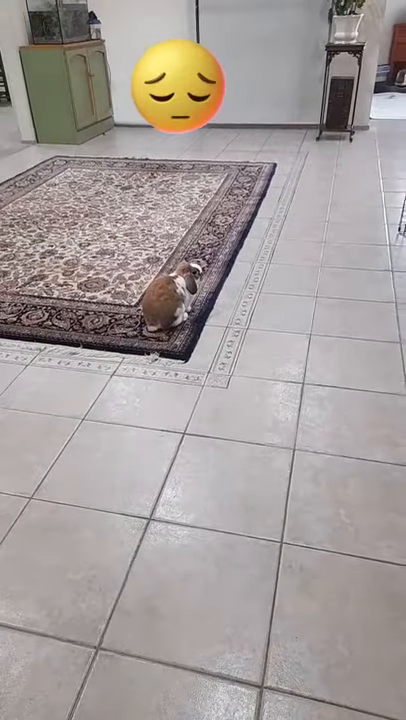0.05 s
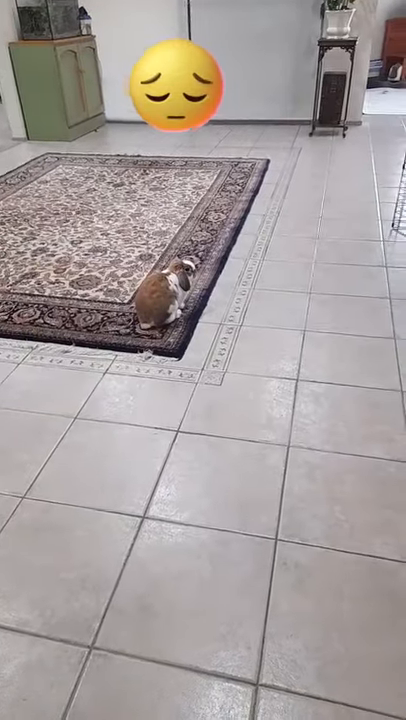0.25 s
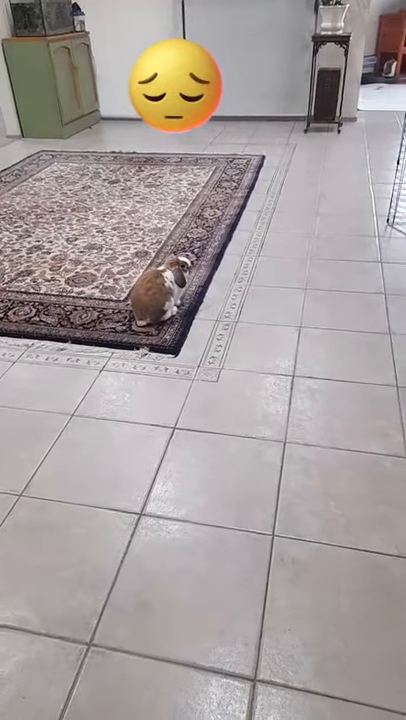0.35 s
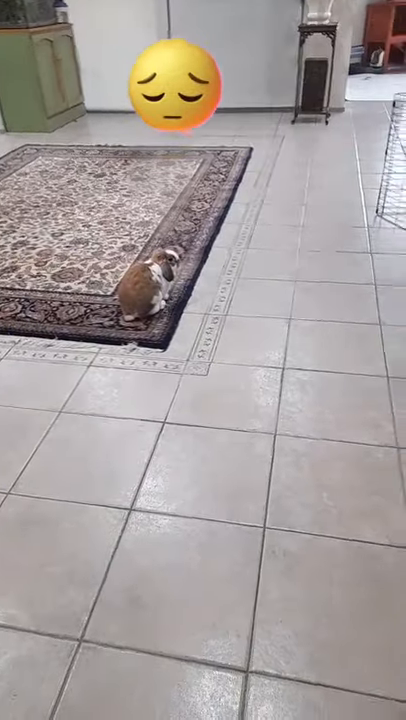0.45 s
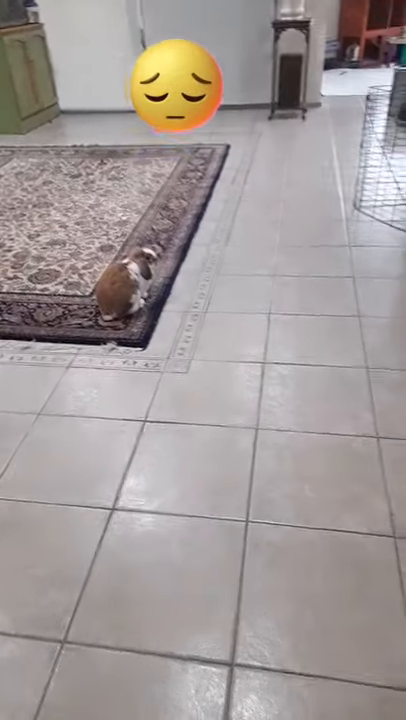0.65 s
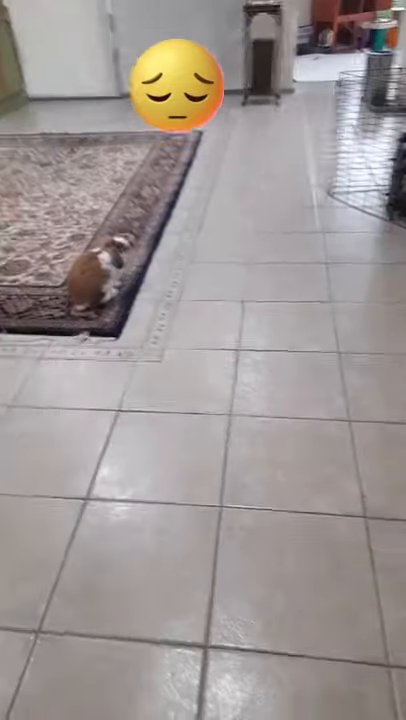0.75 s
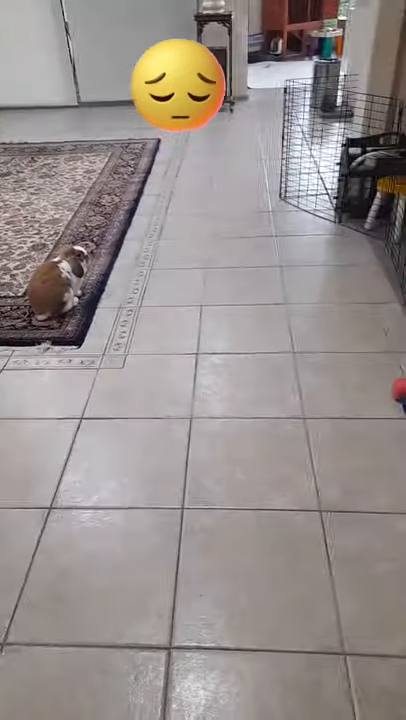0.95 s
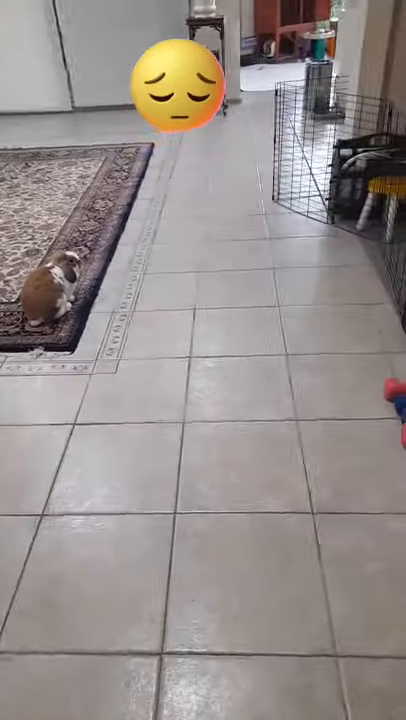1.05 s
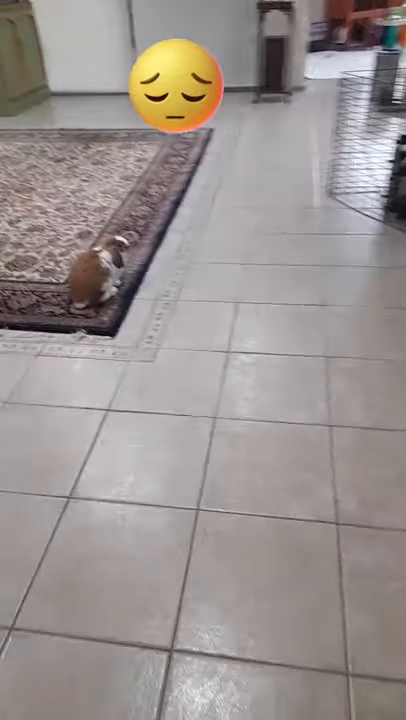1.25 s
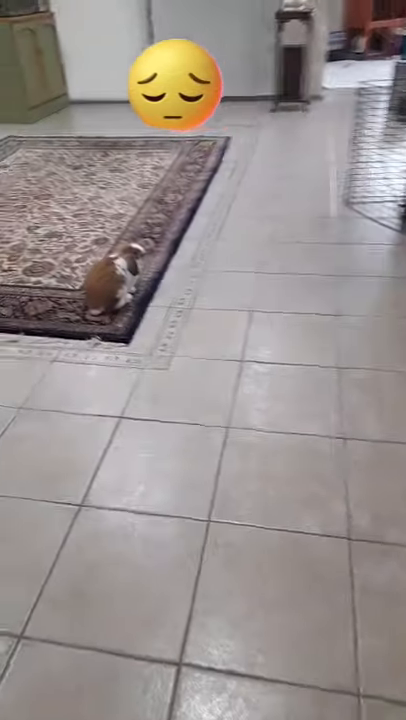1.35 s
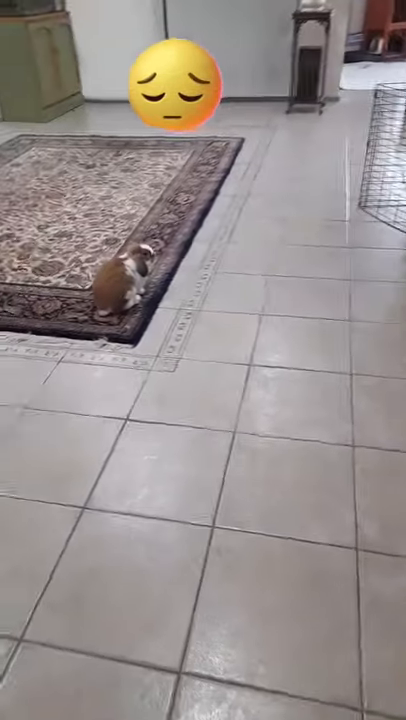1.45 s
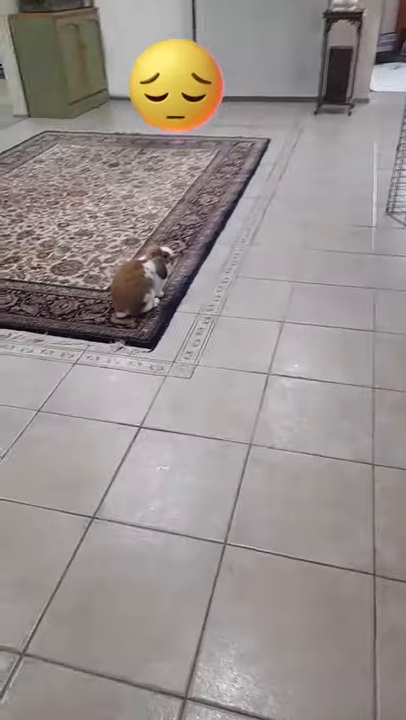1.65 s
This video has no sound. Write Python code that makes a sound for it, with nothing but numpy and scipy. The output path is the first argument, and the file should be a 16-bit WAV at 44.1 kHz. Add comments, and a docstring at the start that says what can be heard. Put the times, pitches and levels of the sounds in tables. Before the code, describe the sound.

A rabbit stamps its foot once, a sharp slap with a low thud that echoes briefly in a large tiled room. Small clicks, light pats and a faint cloth rustle follow close to the microphone, on the right.

```python
"""A stamp on a tiled floor

One foot comes down hard in a large, live room: friction gives a bright scuff, impact a slap that rings
the tile's modes, and the foot's weight a low thud. Small ticks, pats and cloth rustles sound close to
the microphone, on its right, then a dry clack and a much softer step. Contacts are decaying noise bursts
and modes are damped sines. The room adds diffuse reverberation, and rumbles and hisses faintly."""
import sys
import numpy as np
from scipy import signal
from scipy.fft import rfft, irfft
from scipy.io import wavfile
from scipy.ndimage import uniform_filter1d

SR = 44100
rng = np.random.default_rng(int(sys.argv[2]) if len(sys.argv) > 2 else 0)


def log_audio(samples):
    """Write samples as a 16-bit WAV file to the path given in sys.argv[1]."""
    # one column per channel
    frames = np.atleast_2d(samples).T
    # limit to full scale, then quantise
    limited = np.clip(frames, -1, 1)
    pcm = np.round(limited * 32767).astype(np.int16)
    wavfile.write(sys.argv[1], SR, pcm)


N = 74970
T = np.arange(N) / SR
HZ = np.maximum(np.fft.rfftfreq(N, 1 / SR), 1)

# reverberation time of the room (frequency [Hz], t60 [s])
ROOM_T60 = [(100, 0.3), (500, 0.54), (1500, 0.57), (2700, 0.46), (5000, .42), (8000, 0.46), (14000, 0.22)]
# likeness of left and right in the diffuse field (frequency [Hz], coherence [0-1])
COHERENCE = [(60, 1), (280, 0.94), (600, 1), (1500, 0.087), (4000, 0.089), (14000, .1)]
# spectra of the background and an earlier step's reverberation (frequency [Hz], relative density [dB])
RUMBLE_SPECTRUM = [(20, -14.5), (40, -17.5), (62, 8), (90, -1), (130, -5.5), (200, -19), (290, -13.5),
                   (450, -25.5), (900, -24), (1400, -54), (3000, -49.5)]
HISS_SPECTRUM = [(500, 6.5), (1500, 2), (3000, -5.5), (5000, -1), (7500, 2), (10000, 0.5), (13000, -1),
                 (16000, -3)]
EARLIER_STEP_SPECTRUM = [(120, 1.5), (270, 14), (400, 4), (700, 0), (1400, -9), (2500, 3.5), (3500, -10.5),
                         (7000, -9.5), (14000, -13)]
# background envelopes (time [s], level [dB])
RUMBLE_LEVEL = [(0, -59), (.04, -55), (.11, -66.5), (.17, -69), (.21, -58.5), (.56, -62.5), (.66, -61.5),
                (.8, -64), (.89, -58.5), (.97, -64.5), (1.04, -63), (1.1, -66), (1.2, -57), (1.28, -77.5),
                (1.37, -56.5), (1.45, -67), (1.5, -60.5), (1.57, -66.5), (1.7, -68.5)]
HISS_LEVEL = [(0, -68.5), (.16, -70), (.5, -67.5), (.8, -67.5), (.95, -70), (1.08, -73.5), (1.35, -65.5),
              (1.47, -73.5), (1.7, -71.5)]

# swells of cloth friction (peak time [s], level [dB], rise [s], t60 [s])
RUSTLES = [(0.702, -70, 0.055, .2), (0.825, -70, 0.033, .1), (1.203, -61.5, 0.079, 0.046),
           (1.271, -70.5, 0.0048, 0.16)]
# soft footfalls (time [s], level [dB], t60 [s])
FOOTFALLS = [(0.564, -60.5, 0.04), (1.134, -55, 0.037), (1.153, -65.5, 0.36), (1.231, -63.5, 0.15),
             (1.273, -61.5, 0.39), (1.397, -64.5, 0.028)]
# light pats on the tiles (time [s], level [dB])
PATS = [(0.613, -65), (0.672, -61), (0.702, -61), (0.753, -67.5), (.793, -64.5), (0.82, -61.5)]
# sharp ticks (time [s], level [dB], centre frequency [Hz])
TICKS = [(.0282, -33, 13100), (.1235, -49, 12150), (0.4558, -27, 8200), (.6752, -45, 5860),
         (0.7541, -43, 6400), (.816, -51, 5540), (0.8407, -30.5, 11500), (1.267, -44.5, 4900)]
# spectra of the small sounds (frequency [Hz], relative density [dB])
RUSTLE_SPECTRUM = [(900, -31), (2000, -4.5), (3000, -14.5), (5000, -3.5), (8000, 3), (12000, 0.5),
                   (16000, -3)]
FOOTFALL_SPECTRUM = [(80, -3.5), (200, 7.5), (330, 1), (500, 8.5), (720, 4), (950, -2.5), (2000, -31),
                     (5000, -32)]
BRUSH_SPECTRUM = [(500, -2), (1300, -2.5), (2400, 7), (3300, 6.5), (5000, 2), (7000, -4), (9000, -12)]
PAT_SPECTRUM = [(900, -21), (1300, -13), (1600, 3.5), (2100, -3.5), (2800, -14), (5000, -12), (9000, -26)]
CLACK_SPECTRUM = [(700, -24), (1100, -12), (1500, 0.5), (2200, -4), (3000, -3.5), (4200, -8), (6000, -17),
                  (7100, -1), (9000, -9), (16000, -15.5)]

# the stamp's contacts (time [s], level [dB], attack [s], t60 [s])
SCUFFS = [(.2405, -38.5, .002, 0.073), (.2595, -44.5, 0.0016, 0.048)]
SLAPS = [(.226, -59, .014, .03), (.243, -40.5, 0.0056, 0.078), (.2635, -34.5, 0.0026, .055),
         (.279, -42.5, .001, .03)]
# spectra of the stamp (frequency [Hz], relative density [dB])
SCUFF_SPECTRUM = [(500, -7), (1500, -16), (3500, -6.5), (5000, -2), (7000, 3.5), (9000, 1.5), (11500, 2.5),
                  (16000, -12)]
SLAP_SPECTRUM = [(450, -22), (700, -17.5), (1100, -17.5), (1400, -11), (2100, -6), (2500, -4), (2850, -1.5),
                 (3300, -5), (3800, -9.5), (7000, -12.5), (9000, -28)]
THUD_SPECTRUM = [(25, -11.5), (45, -7), (110, -1.5), (170, -1), (230, -7.5), (310, -2.5), (380, -8.5),
                 (470, -16.5), (700, -15), (1100, -27.5), (2000, -45.5)]
# low modes of the room (frequency [Hz], level [dB], rise [s], t60 [s])
ROOM_MODES = [(64.4, -50.5, .17, 0.26), (92.1, -56, .055, .55), (188.7, -56, 0.15, 0.41),
              (290.3, -44, 0.0393, 0.53)]
# modes of the tile (frequency [Hz], level [dB], t60 [s])
TILE_MODES = [(1590, -61.5, 0.53), (2070, -49, .03), (2381, -33.5, 0.033), (2725, -32.5, .016),
              (2810, -34.5, 0.026), (2872, -29, 0.026), (3085, -36.5, 0.021), (3333, -39.5, .03)]
# quick strikes on the tile as the sole lands flat (time [s], gain [dB])
SOLE_HITS = [(0.259, -9.5), (0.2643, -1), (0.2706, -2.5), (0.2781, -6.5)]
# microphone response (frequency [Hz], gain [dB])
MIC_RESPONSE = [(7400, -1), (8100, -12), (9500, -7.5), (11500, -1.5), (14000, -2)]


def from_db(db):
    """Amplitude ratio: tenfold for every 20 dB."""
    return 10 ** (np.asarray(db) / 20)


def unit_rms(x):
    """Normalisation to unit mean power."""
    return x / np.sqrt(np.mean(x ** 2) + 1e-20)


def at_hz(points, hz):
    """Interpolation on a logarithmic frequency axis."""
    frequencies, values = np.transpose(points)
    return np.interp(np.log(hz), np.log(frequencies), values)


def level(curve):
    """Gain over time, interpolated in decibels."""
    return from_db(np.interp(T, *np.transpose(curve)))


def strike(start, attack, t60):
    """Linear rise, then exponential decay of 60 dB in t60 seconds."""
    return np.clip((T - start) / attack, 0, 1) * from_db(-60 * np.maximum(T - start - attack, 0) / t60)


def mode(start, hz, t60):
    """Free vibration of a damped oscillator: a decaying sine."""
    age = np.maximum(T - start, 0)
    return from_db(-60 * age / t60) * np.sin(2 * np.pi * hz * age)


def noise(gains):
    """Spectral shaping of white noise, at unit rms."""
    return unit_rms(irfft(rfft(rng.standard_normal(N)) * gains, N))


def contacts(rows, spectrum):
    """Broadband excitation: one noise burst per row (time [s], level [dB], attack [s], t60 [s])."""
    envelope = sum(from_db(db) * strike(start, attack, t60) for start, db, attack, t60 in rows)
    return noise(from_db(at_hz(spectrum, HZ))) * envelope


def diffuse(spectrum):
    """Diffuse field: stereo noise, coherent only at long wavelengths."""
    coherence = at_hz(COHERENCE, HZ)
    mid, side = rfft(rng.standard_normal((2, N)))
    channels = np.sqrt(1 + coherence) * mid + np.sqrt(1 - coherence) * side * [[1], [-1]]
    return unit_rms(irfft(channels * from_db(at_hz(spectrum, HZ)), N))


def lean(x, right_db):
    """Level difference: the right channel exceeds the left by right_db."""
    return x * from_db(np.array([[-.5], [.5]]) * right_db)


def pan(x, right_db, lag_s=.00048):
    """Path difference: sound from the right reaches the left later and weaker."""
    left, right = lean(x, right_db)
    return np.array([np.pad(left, (int(lag_s * SR), 0))[:N], right])


def room_response():
    """Absorption: diffuse echoes decay at each band's own rate; unit mean energy per channel."""
    white = rfft(diffuse([(1, 0), (SR, 0)]))
    edges = np.geomspace(20, SR / 2, 17)
    echoes = 0
    for low, high in zip(edges, edges[1:]):
        band = irfft(white * ((HZ >= low) & (HZ < high)), N)
        echoes = echoes + band * strike(0, attack=.0028, t60=at_hz(ROOM_T60, np.sqrt(low * high)))
    return echoes / np.sqrt(np.sum(echoes ** 2) / 2)


def in_room(x, room, right_db, wet_db):
    """Direct sound plus reverberation, by convolution with the room's impulse response."""
    return pan(x, right_db) + from_db(wet_db) * signal.fftconvolve(x[None], room, axes=1)[:, :N]


def background():
    """Ambient diffuse field: uneven rumble, faint hiss and an earlier step's dying reverberation."""
    earlier_step = from_db(-64.5 - 60 * T) * diffuse(EARLIER_STEP_SPECTRUM)  # t60 of 1 s
    rumble = level(RUMBLE_LEVEL) * diffuse(RUMBLE_SPECTRUM)
    hiss = level(HISS_LEVEL) * diffuse(HISS_SPECTRUM)
    return pan(rumble, right_db=6) + pan(hiss, right_db=3.5) + earlier_step


def rustles(room):
    """Friction of cloth: swells of noise, grained by random amplitude modulation."""
    grain_db = 1.8 * unit_rms(uniform_filter1d(rng.standard_normal(N), size=90))
    cloth = contacts([(peak - rise, db, rise, t60) for peak, db, rise, t60 in RUSTLES], RUSTLE_SPECTRUM)
    return in_room(cloth * from_db(grain_db), room, right_db=21, wet_db=-.5)


def soft_steps(room):
    """Soft impacts excite mainly low frequencies; friction adds one brush of the sole."""
    footfalls = contacts([(start, db, .002, t60) for start, db, t60 in FOOTFALLS], FOOTFALL_SPECTRUM)
    brush = contacts([(1.267, -62.5, .008, .2)], BRUSH_SPECTRUM)
    return in_room(footfalls + brush, room, right_db=7.5, wet_db=-7.5)


def pats_and_clack(room):
    """Light impacts on tile: dull pats, then a dry clack with a faster attack and wider spectrum."""
    pats = contacts([(start, db, .003, .057) for start, db in PATS], PAT_SPECTRUM)
    clack = contacts([(.8403, -46, .0003, .033)], CLACK_SPECTRUM)
    return in_room(pats, room, right_db=4.5, wet_db=-2) + in_room(clack, room, right_db=11, wet_db=-6)


def ticks(room, half_width_oct=.86):
    """Heavy damping makes a mode a mere snap; a short fizz lingers around the same frequency."""
    clicks = 0
    for start, db, hz in TICKS:
        band = 1 / np.sqrt(1 + (np.log2(HZ / hz) / half_width_oct) ** 4)
        fizz = noise(band) * strike(start, attack=.00014, t60=.014)
        highpass = signal.butter(2, hz / 2, "high", fs=SR, output="sos")
        snap = signal.sosfilt(highpass, mode(start, hz, t60=.0005) + 1e-18)
        clicks = clicks + from_db(db) * (snap + from_db(-18.5) * fizz)
    return in_room(clicks, room, right_db=17.5, wet_db=-13)


def thud(start=.238):
    """Room resonance: the stamp's weight raises low noise and swelling standing waves."""
    body = from_db(-42.5) * diffuse(THUD_SPECTRUM) * strike(start, attack=.058, t60=.71)
    boom = sum(from_db(db) * strike(start, rise, t60) * np.sin(2 * np.pi * hz * (T - start))
               for hz, db, rise, t60 in ROOM_MODES)
    return pan(body, right_db=2.5) + lean(boom, right_db=3)


def stamp(room):
    """Impact excitation: the sole scuffs and slaps, the tile's modes ring and the room prolongs them."""
    scuff = in_room(contacts(SCUFFS, SCUFF_SPECTRUM), room, right_db=20.5, wet_db=-2)
    slap = in_room(contacts(SLAPS, SLAP_SPECTRUM), room, right_db=15, wet_db=-6)
    # a delay of up to one period gives each strike a random phase
    ring = sum(from_db(db + hit_db) * mode(start + rng.random() / hz, hz, t60)
               for hz, db, t60 in TILE_MODES for start, hit_db in SOLE_HITS)
    return scuff + slap + in_room(ring, room, right_db=7, wet_db=0)


def scene():
    """Superposition: the pressures of all sources in the room add."""
    room = room_response()
    return (stamp(room) + thud() + ticks(room) + pats_and_clack(room)
            + rustles(room) + soft_steps(room) + background())


def record(dry, cutoff_hz=15900):
    """Linear filtering: the microphone's response dips near 8 kHz and the top is cut steeply."""
    hz = np.maximum(np.fft.rfftfreq(2 * N, 1 / SR), 1)
    coloured = irfft(rfft(dry, 2 * N) * from_db(at_hz(MIC_RESPONSE, hz)))[:, :N]
    lowpass = signal.ellip(10, .2, 70, cutoff_hz, fs=SR, output="sos")
    return signal.sosfilt(lowpass, coloured)


dry = scene()
out = record(dry)
log_audio(out)
```